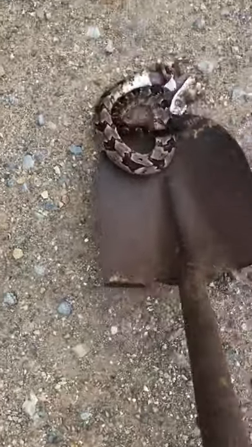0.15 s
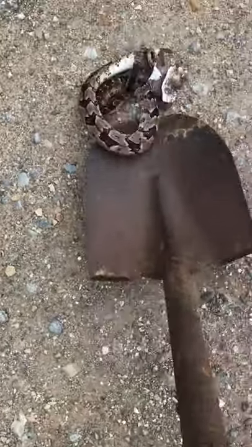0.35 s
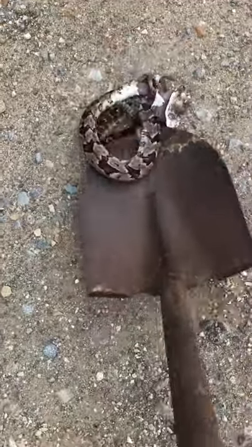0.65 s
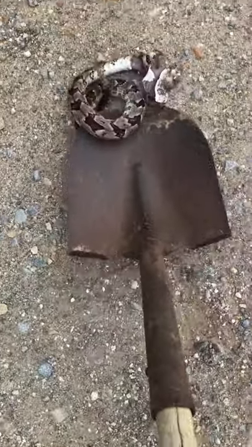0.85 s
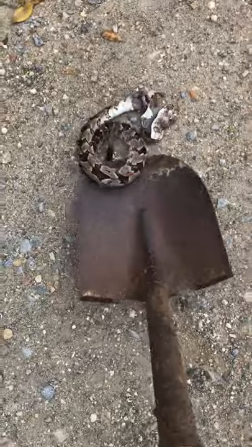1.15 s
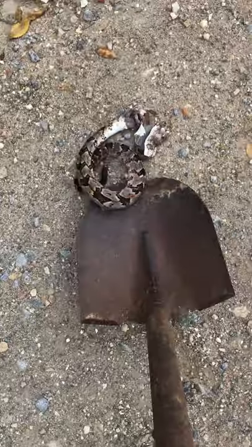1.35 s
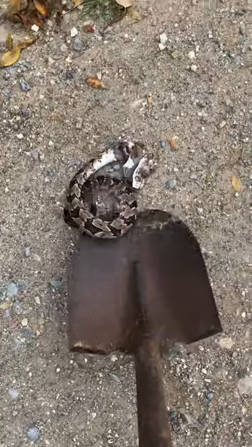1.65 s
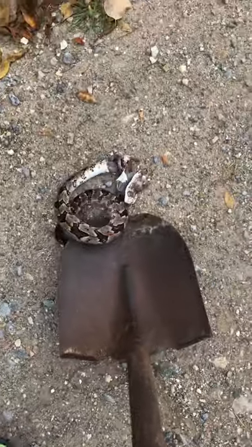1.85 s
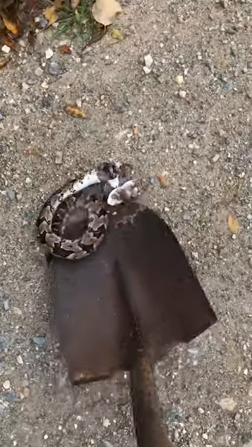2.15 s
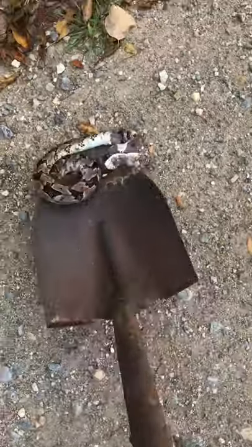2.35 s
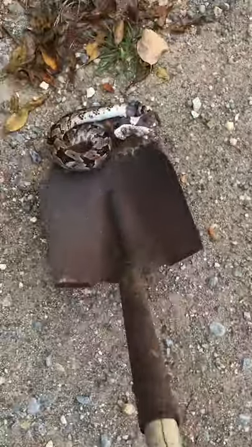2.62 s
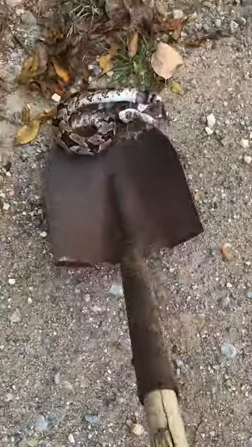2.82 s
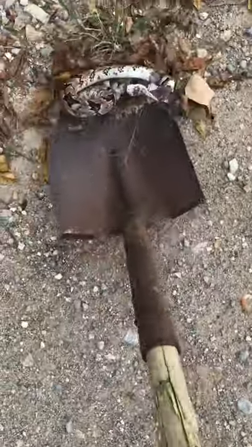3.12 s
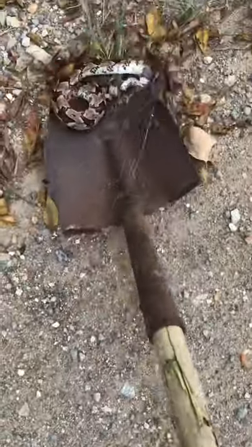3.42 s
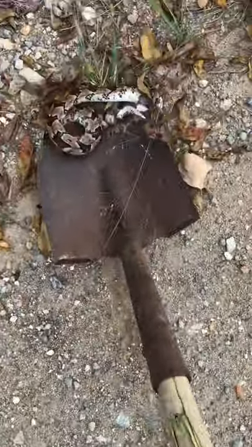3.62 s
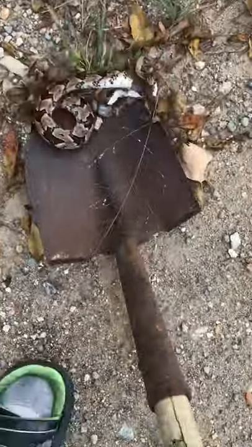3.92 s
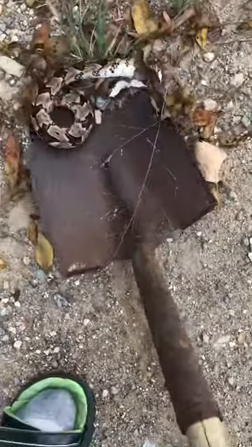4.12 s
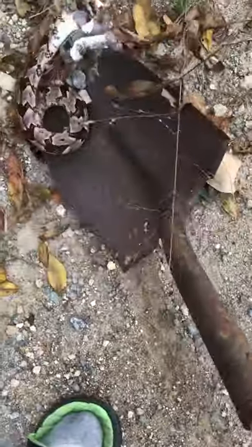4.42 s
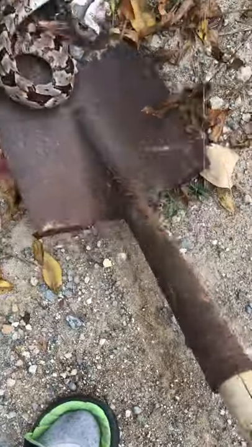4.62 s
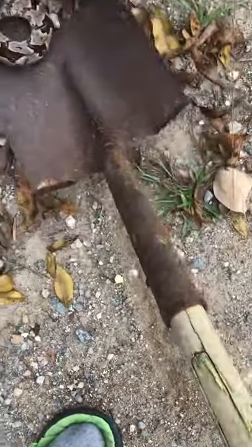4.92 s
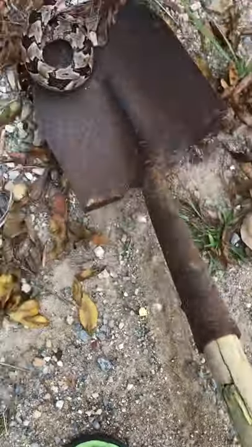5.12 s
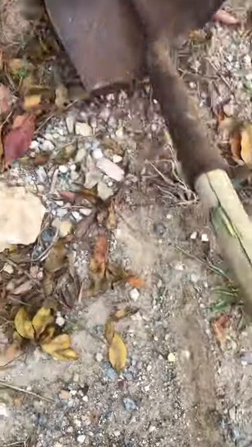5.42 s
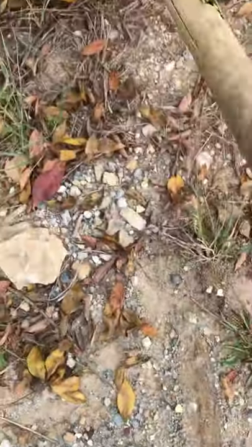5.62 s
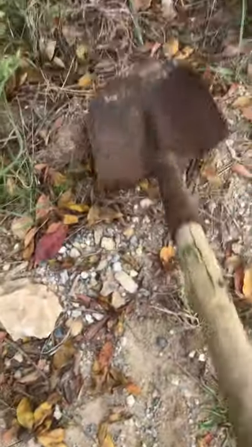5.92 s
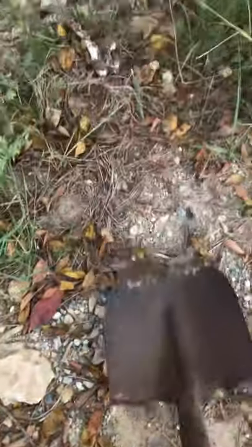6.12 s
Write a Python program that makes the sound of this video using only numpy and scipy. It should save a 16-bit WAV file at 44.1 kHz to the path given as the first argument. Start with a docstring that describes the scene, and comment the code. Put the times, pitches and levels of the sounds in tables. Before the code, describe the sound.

A steel shovel scrapes over a gravel road in short, uneven shoves, heard close up outdoors. It opens with a grating push and a stone knock, followed by lighter crunching and ticks. After a brief lull, a shoe scuffs softly and a pebble clicks sharply at about 1.4 seconds. Scraping resumes at 1.7 seconds, and around 2.2 seconds a stone catches with a loud, chattering clank and a short, damped metallic ring. From 3 to 5 seconds the scrapes are fuller and gritty, dotted with knocks, with sharp cracks near 3.9 and 4.6 seconds. From about 5.5 seconds the blade lifts and the sound thins to crackling dry leaves and snapping twigs, sharpest just before 6 seconds, ending with a small knock at 6.2 seconds. Faint wind puffs and handling bumps touch the microphone, and a distant insect trills, barely audible, in the quiet air.

```python
"""Gravel crunches and grates as a steel shovel is pushed in short shoves over a road into dry leaves.
Stick-slip friction makes grit crackle under the edge; stones catch, chatter and knock, and these
contact forces excite the bending modes of the blade. Loose pebbles and twigs snap and a shoe scuffs.
Wind and a hand nudge the microphone, and a far insect trills in the quiet air."""
import sys
import numpy as np
from scipy import signal
from scipy.fft import rfft, irfft
from scipy.io import wavfile
from scipy.ndimage import uniform_filter1d

SR = 44100
rng = np.random.default_rng(int(sys.argv[2]) if len(sys.argv) > 2 else 0)


def transcribe(signal):
    """Save signal, clipped to [-1, 1], as a 16-bit WAV file at the path in sys.argv[1]."""
    frames = np.atleast_2d(signal).T
    limited = np.clip(frames, -1, 1)
    pcm = np.round(limited * 32767).astype(np.int16)
    wavfile.write(sys.argv[1], SR, pcm)


N = 276058


def undb(db):
    """Amplitude ratio of a level in decibels."""
    return 10 ** (np.asarray(db) / 20)


def unit(x):
    """Normalisation to an rms of 1."""
    return x / np.sqrt(np.mean(x ** 2))


def add(track, onset_s, sound):
    """Superposition: a sound adds to the track from its onset."""
    start = max(0, int(onset_s * SR))
    track[start:start + len(sound)] += sound[:N - start]


def through(x, response):
    """Convolution with the impulse response of a linear system."""
    return signal.fftconvolve(x, response)[:len(x)]


def colour(x, spectrum, size=4096):
    """Minimum-phase filter from (f/Hz, level/dB) points, by folding the cepstrum."""
    hz, db = np.transpose(spectrum)
    log_hz = np.log(np.fft.rfftfreq(size, 1 / SR) + 1)
    log_gain = np.log(undb(np.interp(log_hz, np.log(hz), db)))
    cepstrum = irfft(log_gain)[:size // 2]
    cepstrum[1:] *= 2
    return through(x, irfft(np.exp(rfft(cepstrum, size))))


def resonate(x, hz, q):
    """Second-order resonance of gain 1 at its centre; Q is held at 1 or more."""
    return signal.lfilter(*signal.iirpeak(min(hz, .4 * SR), max(q, 1), fs=SR), x)


def walk(rate_hz):
    """Slow random modulation of rms 1: linear ramps between random values."""
    hold = int(SR / rate_hz)
    steps = np.repeat(rng.standard_normal(N // hold + 1), hold)
    return unit(uniform_filter1d(steps, hold)[:N])


def grains(size, per_s, spread_db):
    """Poisson process of tiny fractures, their levels scattered by a capped exponential law."""
    timing, strength, polarity = rng.random((size, 3)).T
    level_db = spread_db * np.minimum(-np.log(1 - strength), 4.5)
    return unit((timing < per_s / SR) * np.sign(polarity - .5) * undb(level_db) + 1e-12)


def stroke(length_s, edge_s):
    """Pressure envelope with exponential rise and release."""
    t = np.arange(int((length_s + 10 * edge_s) * SR)) / SR
    return (1 - np.exp(-t / edge_s)) * np.exp(-np.maximum(t - length_s + edge_s, 0) / edge_s)


def air():
    """Ambient noise floor: a quiet rumble and hiss whose level drifts."""
    # spectrum of the ambience: f/Hz, level/dB
    air_spectrum = [(30, 22), (100, 14), (250, 6), (600, -1), (930, -24), (1100, -25), (1350, -13),
                    (1800, -7.5), (5000, -49), (15000, -23)]
    return unit(colour(rng.standard_normal(N), air_spectrum)) * undb(-55 + walk(2.65))


def insect(hz=3620, q=18):
    """A far trill: narrow-band noise under random amplitude modulation."""
    trill = resonate(resonate(rng.standard_normal(N), hz, q), hz, q)
    return unit(trill) * undb(-62.5 + 2 * walk(30))


def wind(breeze_db=-53):
    """Turbulent pressure on the microphone: a low rumble of breeze with puffs on top."""
    # puffs of wind: t/s, duration/s, level/dB
    puffs = [(1.352, 0.099, -47), (2.018, .14, -43.5), (2.168, 0.075, -34.5), (3.203, .07, -36.5),
             (3.382, 0.28, -46), (3.788, .16, -36.5), (4.138, 0.17, -43), (4.32, 0.12, -35),
             (4.466, .12, -38.5), (4.796, 0.14, -38.5), (4.939, .1, -34.5), (5.44, 0.24, -42.5)]
    # spectrum of the buffeting: f/Hz, level/dB
    wind_spectrum = [(20, -7.5), (45, -2), (66, 4), (100, -3.5), (160, -13.5), (300, -34), (600, -33),
                     (2000, -85)]
    strength = np.full(N, undb(breeze_db))
    for onset_s, length_s, db in puffs:
        add(strength, onset_s, undb(db) * stroke(length_s, edge_s=0.011))
    gusts = rng.standard_normal(N) * strength * undb(2 * walk(23))
    return unit(colour(gusts, wind_spectrum)) * np.std(gusts)


def handling(q=2.2):
    """Structure-borne sound: a shifting grip reaches the microphone as dull bumps."""
    # shifts of the hand: t/s, duration/s, level/dB, f/Hz
    thumps = [(2.075, 0.029, -41, 131), (2.126, 0.028, -43, 231), (2.203, 0.029, -36, 240),
              (2.818, 0.023, -47, 185), (3.436, 0.035, -42.5, 190), (4.398, 0.029, -50, 210),
              (4.975, 0.019, -30.5, 74)]
    out = np.zeros(N)
    for onset_s, length_s, db, hz in thumps:
        pressure = stroke(length_s, edge_s=0.0086)
        rub = resonate(resonate(rng.standard_normal(len(pressure)), hz, q), hz, q)
        add(out, onset_s, undb(db) * pressure * unit(rub))
    return out


def scuffing():
    """Damped granular crushing: gravel crunches under a soft sole without ringing."""
    # scuffs of the shoe: t/s, duration/s, level/dB
    scuffs = [(1.365, 0.04, -40), (1.392, 0.039, -34)]
    # spectrum of the crunch: f/Hz, level/dB
    shoe_spectrum = [(100, -7), (350, -4.5), (900, 3.5), (1500, 2), (2200, -1), (4000, -7), (6000, -20),
                     (14000, -36)]
    out = np.zeros(N)
    for onset_s, length_s, db in scuffs:
        pressure = stroke(length_s, edge_s=0.0067)
        crunch = colour(grains(len(pressure), per_s=5000, spread_db=4.0), shoe_spectrum)
        add(out, onset_s, undb(db) * pressure * unit(crunch))
    return out


def snapping(size=1024):
    """Band-limited impulses with ground scatter: pebbles and twigs snap clear of the blade."""
    # dry clicks: t/s, peak level/dB, f/Hz
    snaps = [(0.274, -32.5, 6040), (0.313, -24, 9300), (0.806, -21, 9280), (1.023, -35, 3860),
             (1.034, -32.5, 3950), (1.424, -12.5, 2340), (1.508, -35, 3000), (1.554, -28, 2660),
             (1.634, -23, 4110), (1.806, -32, 4050), (1.819, -20.5, 8440), (1.867, -22.5, 9320),
             (1.921, -22, 2820), (2.812, -30, 4260), (2.884, -17, 8400), (2.97, -20.5, 6230),
             (3.441, -20.5, 6200), (3.488, -24.5, 3620), (3.569, -26, 3550), (4.096, -24, 5220),
             (4.197, -21, 12900), (4.582, -11, 6900), (4.619, -18.5, 4400), (4.98, -24.5, 6300),
             (5.021, -29, 4500), (5.45, -14.5, 9400), (5.575, -13.5, 5970), (5.619, -17.5, 5300),
             (5.684, -16, 9400), (5.789, -17.5, 8500), (5.964, -7, 5800), (6.116, -11.5, 5840)]
    out, t = np.zeros(N), np.arange(size) / SR
    for onset_s, db, hz in snaps:
        force = 0.088 * rng.standard_normal(size) * np.exp(-t / 0.0057)  # scatter
        force[0] += 1  # the snap itself
        click = resonate(resonate(force, hz, q=1), hz, q=1)
        add(out, onset_s, undb(db) * click / np.abs(click).max())
    return out


def ringing(lifted, sustain, wash_t60_s=0.077):
    """Modal impulse response of the blade: damped sinusoids over a wash of dense, short-lived modes."""
    # bending modes: f/Hz, grounded level/dB, lifted level/dB, T60/s before scaling by sustain
    blade_modes = [(339, -11, -8, .42), (522, -22, -9, .35), (652, -9, -20, .12), (798, -10, -4, .35),
                   (862, -4, -12, .1), (900, -5, -10, .12), (934, 2, -5, .24), (1125, -13, -10, .14),
                   (1195, -8, -14, .1), (1328, -5, -14, .14), (1413, -5, -14, .18), (1464, -8, -14, .2),
                   (1542, -12, -6, .2), (1722, 4, -1, .21), (1895, -11, -5, .18), (1947, -3, 0, .2),
                   (2095, -9, -1, .16), (2305, -9, -4, .14), (2420, -8, -8, .1), (2750, -12, -8, .06),
                   (2942, -9, -5, .08), (3090, -8, -16, .08), (3410, -11, -16, .05), (3822, -11, -18, .07),
                   (3925, -10, -18, .07), (4128, -7, -18, .07), (5420, -11, -20, .04),
                   (6920, -13, -20, .04)]
    # spectrum of the wash: f/Hz, level/dB
    plate_spectrum = [(300, -21), (600, 1), (900, -3.5), (2000, -5), (4000, -31), (8000, -1), (15000, -19)]
    t = np.arange(SR) / SR
    modes = np.zeros(SR)
    for hz, grounded_db, lifted_db, t60_s in blade_modes:
        phase = rng.uniform(0, 2 * np.pi)  # bending waves reach the edge at different times
        decay = np.exp(-np.log(1000) * t / (sustain * t60_s))
        gain = undb(lifted_db if lifted else grounded_db)
        modes += gain * unit(np.sin(2 * np.pi * hz * t + phase) * decay)
    wash = colour(rng.standard_normal(SR), plate_spectrum) * np.exp(-np.log(1000) * t / wash_t60_s)
    response = unit(modes) + undb(-9.5) * unit(wash)
    return response / np.linalg.norm(response)


def blade(force, lift_s=5.5, land_s=6.14):
    """Forced vibration: the ground damps the blade; lifted, it rings longer and favours other modes."""
    # coupling of force into the steel: f/Hz, gain/dB
    coupling = [(300, 4.5), (650, 1.5), (930, 1.5), (1400, -3.5), (1900, -2.5), (3000, 5), (6000, 7.5)]
    push = colour(force, coupling)
    t = np.arange(N) / SR
    in_air = (t >= lift_s) & (t < land_s)
    grounded = through(push * ~in_air, ringing(lifted=False, sustain=0.76))
    lifted = through(push * in_air, ringing(lifted=True, sustain=1.27))
    return undb(-8.5) * grounded + undb(-3.0) * lifted


def kick(hz, size=512):
    """Impulsive excitation of unit energy; the contact resonance selects the modes it drives."""
    push = resonate(signal.unit_impulse(size), hz, q=1.47)
    return push / np.linalg.norm(push)


def contact(force, hz, crack_db):
    """Radiation from a stone: a broadband crack, five pings of its own and the contact resonance."""
    # spectrum of the crack: f/Hz, level/dB
    crack_spectrum = [(100, -20.5), (350, -7.5), (550, -10.5), (800, 2), (1400, 0), (2500, -4.5),
                      (4000, -3.5), (6000, -6.5), (9500, -9.5), (15000, -27)]
    crack = colour(force, crack_spectrum)
    pings = sum(resonate(crack, ping_hz, q=45) for ping_hz in rng.uniform(2164, 13860, 5))
    stone = unit(crack) + undb(-2.5) * unit(pings)
    return unit(undb(crack_db) * stone + unit(resonate(crack, hz, q=9.0)))


def pebbles(per_s, spread_db, lo_hz, hi_hz, q, sizes=48):
    """Granular impact noise: each grain size ticks and pings at its own resonance, in flurries."""
    out = np.zeros(N)
    for hz in np.geomspace(lo_hz, hi_hz, sizes):
        force = grains(N, per_s / sizes, spread_db) * undb(3.2 * walk(25))
        ping, tick = resonate(force, hz, q), resonate(force, hz, q=1)
        out += unit(ping) + undb(-3) * unit(tick)
    return unit(out)


def shoving(bite_share=0.087, release_s=0.021, trickle_db=-13, trickle_s=0.18):
    """Gains of gravel and grit: shoves and the trickle after them are incoherent and add in power."""
    # shoves: t/s, duration/s, relative level midway/dB, swell/dB, offset for grit and leaves/dB
    shoves = [(0.008, 0.06, -32, 14.5, -7.5), (0.13, 0.14, -46.5, -11, 1), (0.358, 0.037, -41, -2, -3.5),
              (0.593, 0.22, -41, 2, -4.5), (0.814, 0.053, -51, 15, -8), (1.157, 0.012, -52, 12, -6),
              (1.661, 0.099, -42.5, 10.5, 0), (1.778, 0.16, -40.5, -4, -29), (1.998, .22, -42.5, 4, -2.5),
              (2.323, 0.024, -32.5, 9, -5), (2.383, 0.23, -40, 3, -9.5), (2.653, 0.069, -32.5, -1, -6.5),
              (2.781, 0.26, -39.5, -7, -3), (2.986, 0.39, -33, 1, -5), (3.372, 0.055, -44.5, -17, 6),
              (3.61, 0.32, -31.5, 13.5, -12.5), (3.944, 0.15, -47, -10, -2.5), (4.143, 0.41, -43.5, 4, 1),
              (4.492, 0.392, -33, 4, 0.5), (4.897, 0.083, -41, -5, -14), (5.066, 0.13, -39.5, 15, -2),
              (5.191, .17, -40.5, -12, 1), (5.356, 0.288, -43.5, 1, -1.5), (5.665, .07, -51, -3, 10),
              (5.74, .17, -55, 0, 6), (5.91, .09, -42, 0, 2), (6.069, 0.1, -44.5, 10, 6)]
    gravel_power = np.full(N, undb(-56.5) ** 2)  # the resting edge still stirs a few grains
    grit_power = np.full(N, undb(-60.5) ** 2)
    t = np.arange(SR) / SR
    for onset_s, length_s, db, swell_db, grit_db in shoves:
        after_s = np.maximum(t - length_s, 0)
        bite = 1 - np.exp(-t / (bite_share * length_s))
        swell = undb(swell_db * (np.minimum(t / length_s, 1) - .5))
        push = swell * np.exp(-after_s / release_s)
        trickle = undb(trickle_db) * np.exp(-after_s / trickle_s)
        effort = undb(db) * bite * np.maximum(push, trickle)
        add(gravel_power, onset_s, effort ** 2)
        add(grit_power, onset_s, (effort * undb(grit_db)) ** 2)
    return np.sqrt(gravel_power), np.sqrt(grit_power)


def sliding():
    """Stick-slip friction of the edge over gravel and grit; returns direct sound and blade force."""
    # spectra of coarse gravel and of fine grit: f/Hz, level/dB
    gravel_spectrum = [(150, -47), (450, -2), (650, -9), (880, -1.5), (1500, 4), (2400, -2.5), (3800, 1.5),
                       (5500, -7.5), (9000, -2), (15000, -24)]
    grit_spectrum = [(400, -51), (1500, -7), (3500, -3.5), (6000, 4.5), (9500, 4), (11000, 3), (14000, 3.5),
                     (16000, -1.5)]
    gravel_gain, grit_gain = shoving()
    slip_db = 2 * walk(40) + 0.38 * walk(200)
    coarse = pebbles(per_s=6000, spread_db=4.0, lo_hz=540, hi_hz=9170, q=14.5)
    coarse *= gravel_gain * undb(slip_db)
    fine = pebbles(per_s=9700, spread_db=3.5, lo_hz=2420, hi_hz=15500, q=38)
    fine *= grit_gain * undb(0.6 * slip_db)
    gravel = unit(colour(coarse, gravel_spectrum)) * np.std(coarse)
    grit = unit(colour(fine, grit_spectrum)) * np.std(fine)
    return undb(-4.5) * gravel + undb(-1) * grit, undb(-6.0) * coarse


def grating():
    """Stick-slip chatter of a caught stone, then elastic recoil; returns direct sound and blade force."""
    # caught stones: t/s, duration/s, level/dB, contact f/Hz, crack gain/dB, blade drive gain/dB
    grates = [(0.038, 0.044, -27, 1340, 6, -1.5), (0.06, 0.019, -24, 6500, 23, -12),
              (1.773, 0.0066, -10.5, 14400, -8.5, -19), (2.232, 0.011, -19, 3200, 14, 2.5),
              (2.244, 0.055, -22.5, 1400, 3, 2), (2.261, 0.041, -22.5, 757, -10, -11),
              (2.293, 0.011, -21, 445, 5, -8), (2.295, 0.00407, -21.5, 1700, -9, 10.5),
              (2.52, 0.031, -35, 1970, 10, -12), (3.318, 0.0205, -26.5, 1425, 11, -2),
              (3.853, 0.049, -24.5, 1220, -2.5, -11), (3.882, 0.0046, -9, 3100, -24, -21),
              (3.905, .04, -24, 910, 0, -39), (4.867, 0.018, -28, 1210, 2, -14),
              (5.929, 0.0083, -13.5, 2730, -9, -14.5), (5.93, 0.036, -25, 1900, -3, -15),
              (5.965, 0.024, -24.5, 1590, 18, -7)]
    direct, drive = np.zeros((2, N))
    for onset_s, length_s, db, hz, crack_db, drive_db in grates:
        pressure = stroke(length_s, edge_s=0.0036)
        slips = unit(np.tanh(grains(len(pressure), per_s=9900, spread_db=1.5) / 2))
        force = slips * pressure * undb(db)
        chatter = unit(resonate(force, hz, q=7.9)) * np.std(force)
        recoil = np.linalg.norm(force) * kick(hz)  # the bent blade springs back
        add(direct, onset_s, contact(force, hz, crack_db) * np.std(force))
        add(drive, onset_s, undb(drive_db) * chatter)
        add(drive, onset_s + .7 * length_s, undb(drive_db) * recoil)
    return direct, drive


def knocking(size=2048, rise_s=0.00067):
    """Impact: a stone strikes the steel and briefly crumbles; returns direct sound and blade force."""
    # impacts: t/s, peak level/dB, contact f/Hz, decay time/s, blade drive gain/dB
    knocks = [(0.113, -11, 930, .002, -4), (0.507, -29.5, 1480, 0.0016, -1), (0.594, -28, 3270, 0.0058, -9),
              (0.638, -26, 1490, 0.0055, -9), (0.698, -25, 1520, 0.0024, 2),
              (0.738, -22.5, 960, 0.0035, -8), (1.692, -24.5, 5500, .005, 4.5), (1.751, -22, 1400, .004, 0),
              (1.774, -18, 1680, .003, 8), (1.839, -21.5, 1900, 0.0038, -9), (1.92, -19, 650, .0015, -18),
              (2.238, -4, 2380, 0.0053, 4), (2.296, -6, 1700, .0025, -14),
              (2.465, -27.5, 2980, 0.0061, 11.5), (2.525, -16, 1720, 0.0026, 7),
              (2.669, -28, 1960, .005, 7), (2.718, -23.5, 945, 0.0084, 3.5), (2.85, -22, 940, 0.011, -4.5),
              (2.921, -25, 2130, 0.0079, 4), (3.064, -20, 4180, 0.0049, -9),
              (3.084, -18, 1410, 0.007, -2.5), (3.148, -18, 5600, 0.02, -10),
              (3.249, -18, 1220, 0.0037, 3.5), (3.298, -18, 3190, 0.0097, 0.5),
              (3.363, -18.5, 3280, 0.009, 6), (3.837, -16.5, 1250, 0.0014, 4.5),
              (3.885, -5, 1430, 0.0014, 1.5), (4.01, -17.5, 1570, .0035, -3.5),
              (4.798, -17, 1210, 0.007, -7), (5.27, -25, 1680, 0.0061, 4), (6.169, -21, 870, 0.004, 0.5)]
    direct, drive = np.zeros((2, N))
    t = np.arange(size) / SR
    for onset_s, db, hz, decay_s, drive_db in knocks:
        crumbling = np.exp(-t / decay_s) * (1 - np.exp(-t / rise_s))
        force = grains(size, per_s=12000, spread_db=-1.0) * crumbling
        force[0] += 1.5  # the first tick
        knock = contact(force, hz, crack_db=8.0)
        knock = undb(db) * knock / np.abs(knock).max()
        add(direct, onset_s, knock)
        add(drive, onset_s, undb(drive_db) * np.linalg.norm(knock) * kick(hz))
    return direct, drive


def scene():
    """Superposition in mono: the shovel's contacts sound directly and through the blade, over the rest."""
    direct, force = np.sum([sliding(), grating(), knocking()], axis=0)
    shovel = direct + blade(force)
    return (shovel + snapping() + scuffing() + handling() + wind() + air() + insect())[None]


def record(dry, bass_cut_hz=36, top_hz=16000, ceiling=.85):
    """Band limiting and soft saturation: the microphone sheds rumble and cuts the top, and a soft limit rounds
    the loudest peaks."""
    thinned = signal.sosfilt(signal.butter(3, bass_cut_hz, "high", fs=SR, output="sos"), dry)
    rounded = ceiling * np.tanh(thinned / ceiling)
    return signal.sosfilt(signal.ellip(10, .2, 70, top_hz, fs=SR, output="sos"), rounded)


dry = scene()
out = record(dry)
transcribe(out)
```